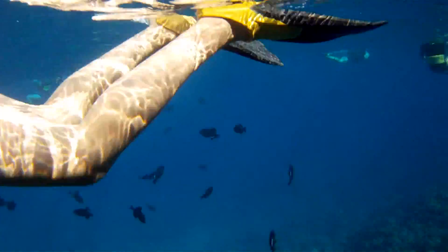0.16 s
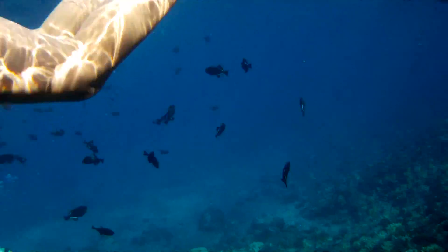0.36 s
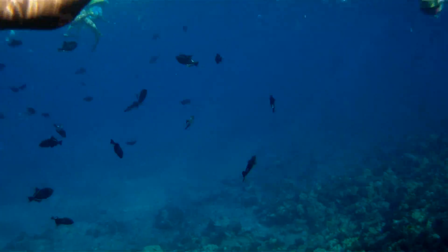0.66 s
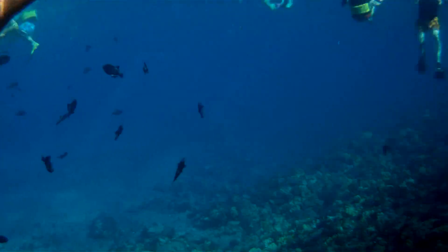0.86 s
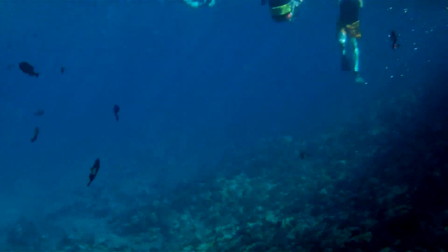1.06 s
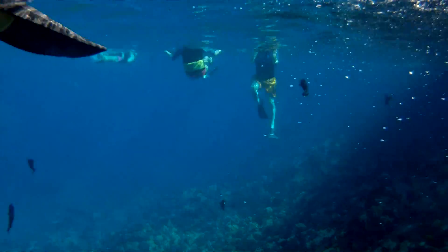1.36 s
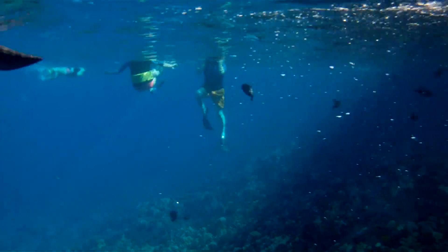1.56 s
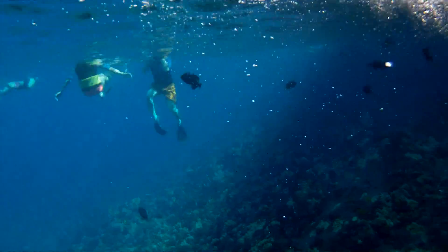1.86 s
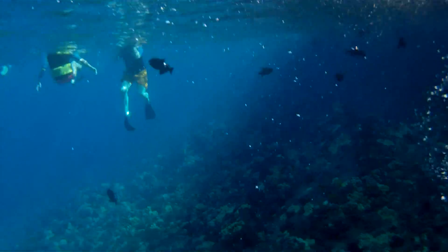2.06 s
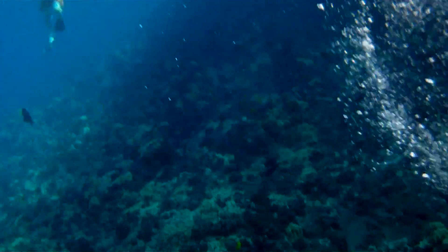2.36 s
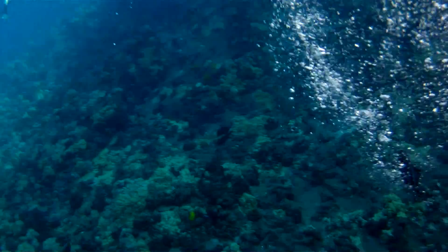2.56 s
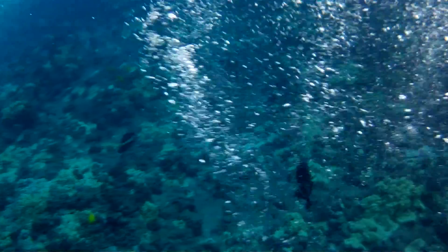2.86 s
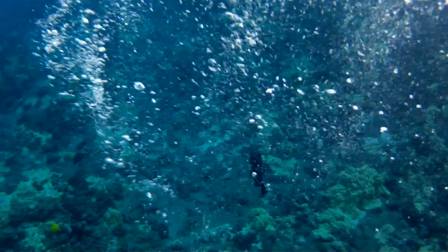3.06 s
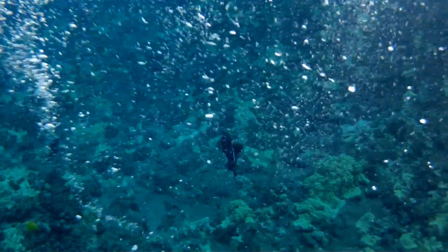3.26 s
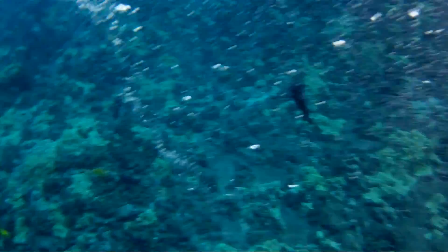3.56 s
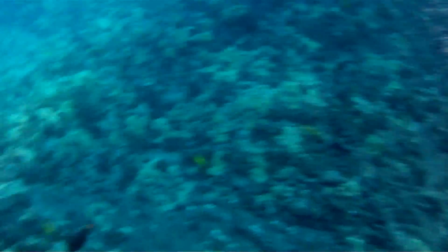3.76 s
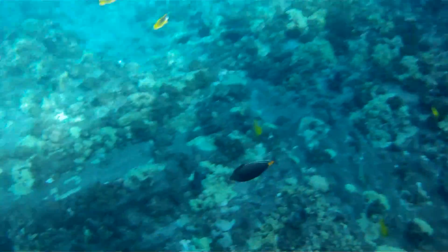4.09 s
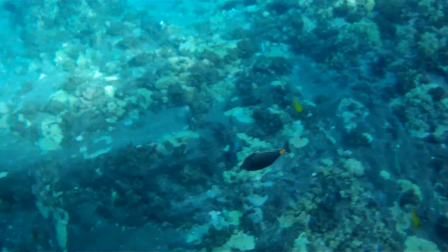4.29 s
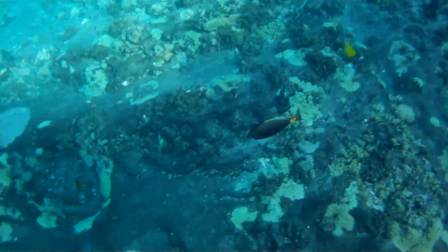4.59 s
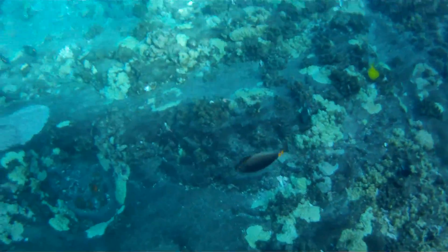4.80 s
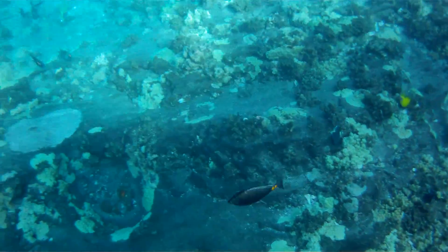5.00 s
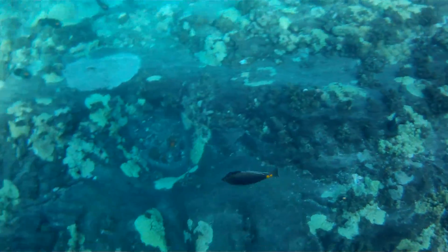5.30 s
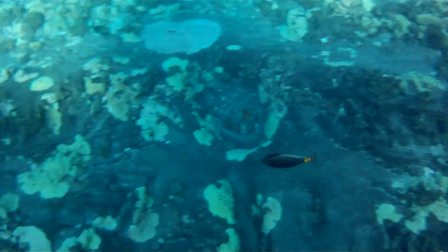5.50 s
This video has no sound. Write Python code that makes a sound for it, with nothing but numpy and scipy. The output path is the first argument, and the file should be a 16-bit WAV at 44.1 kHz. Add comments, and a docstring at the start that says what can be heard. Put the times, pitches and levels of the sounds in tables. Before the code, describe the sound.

Muffled underwater bubble fizz swells and thins over a coral reef, with a fin's churn, sharp bubble pops and constant shrimp crackle.

```python
"""Under water over a coral reef, heard from inside a camera's waterproof case.
Random clicks, shaped by the case, make bubbles that fizz and ring near 1.5 kHz and a fin that churns past.
Single bubbles, large and small, gulp or chirp as fading tones that rise in pitch; others pop as short knocks.
Snapping shrimp crackle all around, each snap a resonant click with scattered echoes.
A faint far tone, a gliding sine, rises and falls."""
import sys
import numpy as np
from scipy import signal
from scipy.fft import rfft, irfft
from scipy.io import wavfile

SR = 44100
rng = np.random.default_rng(int(sys.argv[2]) if len(sys.argv) > 2 else 0)


def persist_wave(psi):
    """Save psi, clipped to +-1, as 16-bit WAV."""
    counts = np.round(np.clip(psi, -1, 1) * 32767).astype(np.int16)
    wavfile.write(sys.argv[1], SR, np.atleast_2d(counts).T)


N = 248724
TIME = np.arange(N) / SR  # seconds

# How strong a shrimp's snap is at each pitch. Each row: frequency in Hz, relative level in dB.
SHRIMP_SPECTRUM = [(200, -41.5), (1200, -5.5), (2500, 6), (4000, 0), (6600, -4), (7300, -14), (8500, -14.5),
                   (9400, -29.5), (11000, -25.5), (12500, -49), (16000, -53.5)]

# Larger bubbles, relative to the fizz; they grow louder once, over a ramp centred on COARSE_AT_S.
BURBLE_DB, COARSE_DB, COARSE_AT_S, COARSE_OVER_S = -9.5, 6, 3.85, 0.52
# One fin stroke: its wake builds, peaks and dies away, driving churn, larger bubbles and spray.
FIN_AT_S, FIN_BUILD_S, FIN_FADE_S = 0.75, 0.22, 0.23
FIN_CHURN_DB, FIN_BURBLE_DB, FIN_SPRAY_DB = -53, -49.5, -53.5
SPRAY_LEAD_S, SPRAY_BUILD_S, SPRAY_FADE_S = 0.078, 0.54, 0.41
SEA_CHURN_DB = -65  # steady stirring of the open water
LUMP_PER_S, LUMP_DB = 11, 2  # eddies per second in the wake, and their typical scatter in level
STRAY_PER_S, STRAY_DB, STRAY_SCATTER_DB = 8, -42, 1.5  # shrimp at middle distance; peak level
SWING_AT_S, SWING_BUILD_S, SWING_FADE_S, SWING_DB = 3.65, 0.03, 0.11, -82
# Far tone: pitch and level at its top, and how far both have dropped TONE_HALF_S to either side.
TONE_AT_S, TONE_HALF_S = 4.45, 0.4
TONE_HZ, TONE_SAG_HZ, TONE_DB, TONE_FADE_DB = 385, 32.06, -75, 3
TOP_HZ = 15500  # nearly all sound above this is cut


def water():
    """Thousands of bubbles a second merge into a fizz; the fin's wake churns underneath in lumps."""
    # Spectra of small bubbles, larger bubbles and stirred water.
    # Each row: frequency in Hz, relative level in dB.
    fizz_spectrum = [(100, -53), (500, -42.5), (900, -21.5), (1150, -13), (1350, -2.5), (1480, 2.5),
                     (1680, -2), (1900, -13.5), (2300, -24), (3200, -28.5), (4000, -35.5), (7000, -42.5),
                     (12000, -91.5)]
    burble_spectrum = [(100, -54), (400, -23.5), (740, -16.5), (860, -5.5), (1170, 1), (1270, 9.5),
                       (1400, 4.5), (1650, -12.5), (2500, -37), (8000, -63)]
    churn_spectrum = [(25, -54), (60, -31), (100, -22), (150, -10), (340, 0.5), (600, 4), (900, 11.5),
                      (1500, -3), (3000, -19), (6000, -22), (12000, -46.5)]
    # Level of the fizz as bubble clouds drift by. Each row: time in seconds, level in dB.
    cloud = [(0, -50.5), (.3, -44), (.5, -40), (.78, -40.5), (1.4, -50), (1.88, -52.5), (2.12, -44.5),
             (2.6, -41), (2.87, -40.5), (3.35, -44), (3.85, -39.5), (4.4, -40.5), (4.85, -40.5),
             (5.4, -41.5), (5.63, -40.5)]

    cloud_db, = curves(cloud)
    wake = swell(FIN_AT_S, FIN_BUILD_S, FIN_FADE_S)
    coarse = np.clip(0.5 + (TIME - COARSE_AT_S) / COARSE_OVER_S, 0, 1)

    fizz = unit(through_case(clicks(per_s=3000, spread_db=2.5, ceiling_db=14), fizz_spectrum))
    burble = unit(through_case(clicks(per_s=2000, spread_db=4.5, ceiling_db=10), burble_spectrum))
    churn = unit(through_case(clicks(per_s=1400, spread_db=1.5, ceiling_db=7), churn_spectrum))

    # Independent causes of one sound add by power, hence hypot.
    cloud_burble = undb(cloud_db + BURBLE_DB + COARSE_DB * coarse)
    burble_gain = np.hypot(cloud_burble, wake * undb(FIN_BURBLE_DB))
    churn_gain = np.hypot(undb(SEA_CHURN_DB), wake * lumps() * undb(FIN_CHURN_DB))
    return fizz * undb(cloud_db) + burble * burble_gain + churn * churn_gain


def lumps():
    """The wake sheds eddies, so its churn has a gain that wanders from eddy to eddy."""
    steps = rng.standard_normal(400)
    return undb(LUMP_DB * np.interp(TIME * LUMP_PER_S, np.arange(len(steps)), steps))


def spray():
    """The passing fin whips up the finest bubbles, which sizzle and peak just ahead of its wake."""
    # Each row: frequency in Hz, relative level in dB.
    spectrum = [(1000, -17), (2300, 9.0), (3200, -1.5), (4200, -7.5),
                (6500, -10.0), (7300, -16.5), (8500, -25), (12000, -55.5)]
    gain = undb(FIN_SPRAY_DB) * swell(FIN_AT_S - SPRAY_LEAD_S, SPRAY_BUILD_S, SPRAY_FADE_S)
    sizzle = clicks(per_s=2300, spread_db=7, ceiling_db=18.5)
    return unit(through_case(sizzle, spectrum)) * gain


def gulps(cycles=9, rise=0.034, size=6000):
    """A single bubble, large or small, gulps or chirps for some cycles, rising in pitch as it goes up."""
    # Each row: start in seconds, level before fading in dB, starting pitch in Hz.
    bubbles = [(0.295, -45.5, 807), (0.3, -55, 518), (0.645, -40.5, 802), (0.65, -52, 478),
               (0.77, -38, 906), (0.779, -61, 304), (1.164, -45, 822), (1.17, -55.5, 560),
               (1.574, -39, 1450), (2.928, -27, 1744), (3.635, -52.5, 645), (3.66, -50.5, 587),
               (3.931, -22.5, 1420), (4.527, -37.5, 2870), (4.82, -32.5, 3100), (5.1, -42, 2320),
               (5.109, -41, 2800)]
    out = np.zeros(N)
    for s, db, hz in bubbles:
        turns = hz * np.arange(size) / SR
        age = turns / cycles
        envelope = (1 - np.exp(-turns)) * np.exp(-age)
        ring = np.sin(2 * np.pi * turns * (1 + rise * age / 2))
        add(out, s, undb(db) * envelope * ring)
    return out


def pops():
    """A bubble bursting on the case knocks its low resonances."""
    # Bursting bubbles. Each row: start in seconds, peak level in dB, centre frequency in Hz.
    bursts = [(0.860, -28.5, 2880), (0.917, -20, 2010), (1.903, -44, 2400), (2.0951, -27, 2360),
              (2.417, -35.5, 2700), (2.929, -23.5, 1840), (3.309, -33, 2840), (4.39, -35, 2700),
              (4.82, -25.5, 2110)]
    # Spectrum of a burst. Each row: frequency in Hz, relative level in dB.
    burst_spectrum = [(200, -7.5), (1000, -9.5), (1500, 13), (2200, -7.5), (6500, -3.5), (9000, -9.5),
                      (15000, -31.5)]
    out = np.zeros(N)
    for s, db, hz in bursts:
        knock = echoed(echo_db=-9, decay_s=0.004)
        for _ in range(2):
            knock = resonate(knock, hz, q=0.96)
        pop = through_case(knock, burst_spectrum)
        add(out, s, pop / np.abs(pop).max() * undb(db))
    return out


def near_shrimp():
    """The nearest shrimp snap one by one."""
    # Each row: start in seconds, peak level in dB, centre frequency in Hz.
    nearest = [(0.136, -37, 5100), (0.456, -37, 5500), (0.4904, -31, 4180), (0.7768, -31, 5200),
               (0.8587, -29, 5800), (0.9236, -25.5, 4800), (0.9698, -36.5, 4350), (0.9986, -37.5, 6540),
               (1.0875, -36.5, 4600), (1.207, -42, 6240), (1.347, -36.5, 6000), (1.551, -37, 4370),
               (1.903, -33.5, 5340), (2.0505, -34.5, 6040), (2.229, -36.5, 4730), (2.2827, -35.5, 4030),
               (2.568, -36.5, 6580), (2.6182, -33.5, 6260), (2.7044, -34, 4750), (3.3056, -35, 4900),
               (3.4422, -39.5, 5400), (3.5235, -37.5, 4300), (3.6623, -31.5, 5370), (3.714, -32.5, 5700),
               (3.7324, -33.5, 4410), (3.844, -34.5, 4960), (3.902, -38.5, 6350), (3.9477, -34, 6760),
               (4.109, -35.5, 4280), (4.559, -34, 4330), (4.7549, -32, 5130), (4.8915, -34, 4830),
               (5.585, -34.5, 5500)]
    out = np.zeros(N)
    for s, db, hz in nearest:
        add(out, s, snap(db, hz))
    return out


def snap(db, hz):
    """A claw collapses a cavity: one crack with a few milliseconds of echo."""
    crack = resonate(echoed(echo_db=-4, decay_s=0.0035), hz, q=2.8)
    crack = through_case(crack, SHRIMP_SPECTRUM)
    return crack / np.abs(crack).max() * undb(db)


def stray_shrimp(low_hz=4300, high_hz=7000):
    """Shrimp a little further off snap at random moments, each with its own colour."""
    out = np.zeros(N)
    for slot in range(int(STRAY_PER_S * N / SR)):  # one snap somewhere in each slot of time
        when, nearness, colour = rng.random(3)
        db = STRAY_DB + STRAY_SCATTER_DB * (2 * nearness - 1)
        hz = low_hz + colour * (high_hz - low_hz)
        add(out, (slot + when) / STRAY_PER_S, snap(db, hz))
    return out


def far_shrimp(count=24):
    """Colonies all over the reef crackle, each with its own path and colour."""
    # Level of the whole crackle. Each row: time in seconds, level in dB.
    crackle = [(0, -61), (1.35, -59.5), (1.75, -66.5), (2.3, -61.5), (3.2, -68.5), (3.9, -62), (4.5, -61.5),
               (4.9, -62), (5.6, -62.5)]
    level_db, = curves(crackle)
    reef = np.zeros(N)
    for hz in np.geomspace(2800, 8000, count):
        colony = clicks(per_s=40, spread_db=6, ceiling_db=24)
        path = echoed(echo_db=-6, decay_s=0.004)
        reef += signal.oaconvolve(resonate(colony, hz, q=3.2), path)[:N]
    return unit(through_case(reef, SHRIMP_SPECTRUM)) * undb(level_db)


def swing():
    """Water rumbles briefly over the case as it is swung round."""
    # Each row: frequency in Hz, relative level in dB.
    spectrum = [(25, -18.5), (70, -8), (150, -3.5), (400, -10.5), (1500, -54.0)]
    rumble = unit(through_case(rng.standard_normal(N), spectrum))
    return rumble * undb(SWING_DB) * swell(SWING_AT_S, SWING_BUILD_S, SWING_FADE_S)


def far_tone():
    """A faint, nearly pure tone arches slowly in pitch and level through the water."""
    arch = ((TIME - TONE_AT_S) / TONE_HALF_S) ** 2
    hz = TONE_HZ - TONE_SAG_HZ * np.minimum(arch, 2)
    gain = undb(TONE_DB - TONE_FADE_DB * arch ** 2)
    return gain * np.sqrt(2) * np.sin(2 * np.pi * np.cumsum(hz) / SR)  # sqrt(2): a sine of rms 1


def clicks(per_s, spread_db, ceiling_db):
    """Random impulses: most are far and small, a few near and large."""
    chance = rng.random(N)
    size = rng.exponential(size=N)
    sign = rng.choice([-1, 1], N)
    return (chance < per_s / SR) * sign * undb(np.minimum(spread_db * size, ceiling_db))


def echoed(echo_db, decay_s, size=2048):
    """A sharp impulse, a near reflection that colours it, then scattered returns from surface and coral."""
    t = np.arange(size) / SR
    returns = rng.standard_normal(size) ** 3 * np.exp(-t / decay_s)  # cubing makes a few stand out
    path = (t == 0) + undb(echo_db) * returns / np.linalg.norm(returns)
    path[rng.integers(4, 30)] += rng.uniform(-0.6, 0.6)  # the near reflection
    return path


def through_case(x, spectrum, size=4096):
    """Give x a source's spectrum and the ringing of the case, which only ever follows the sound."""
    # Resonances and dead spots of the case. Each row: centre in Hz, width in Hz, boost or cut in dB.
    case = [(1450, 163, 4.5), (1552, 110, -5.5), (1634, 54, 3.5), (2047, 58, -12), (2254, 296, 6.5),
            (2610, 91, -9), (2857, 182, 7), (3240, 220, 4), (3790, 140, -5), (4370, 110, 5.5),
            (4770, 190, -4), (5325, 500, 5.5), (5790, 300, -6), (6330, 860, 5), (9800, 250, -4)]
    f = np.linspace(0, SR / 2, size // 2 + 1)
    hz, db = np.transpose(spectrum)
    db = np.interp(np.log(f + 1), np.log(hz), db)
    for centre, width, gain in case:
        db = db + gain * np.exp(-2 * ((f - centre) / width) ** 2)
    # Folding the cepstrum (the spectrum of the log spectrum) forward leaves no ringing before the sound.
    cepstrum = irfft(np.log(undb(db)))
    cepstrum[1:size // 2] *= 2
    cepstrum[size // 2 + 1:] = 0
    ringing = irfft(np.exp(rfft(cepstrum)))
    return signal.fftconvolve(x, ringing)[:len(x)]


def resonate(x, hz, q):
    """One broad resonance, which favours the pitches around hz."""
    b, a = signal.iirpeak(min(hz, SR / 4), max(q, 0.5), fs=SR)
    return signal.lfilter(b, a, x)


def swell(at_s, build_s, fade_s):
    """A gain that grows exponentially to 1 and dies away again."""
    return np.exp(-np.maximum((at_s - TIME) / build_s, (TIME - at_s) / fade_s))


def undb(db):
    """Decibels to gain."""
    return 10 ** (np.asarray(db) / 20)


def unit(x):
    """Scale to rms 1."""
    return x / np.sqrt(np.mean(x ** 2))


def curves(table):
    """Each column of a table of timed rows, sample by sample."""
    s, *columns = np.transpose(table)
    return [np.interp(TIME, s, c) for c in columns]


def add(out, s, x):
    """Mix x into out from time s on."""
    i = max(int(s * SR), 0)
    out[i:i + len(x)] += x[:N - i]


def scene():
    """All sources meet at the one microphone in the case."""
    bubbles = water() + spray() + gulps() + pops()
    shrimp = near_shrimp() + stray_shrimp() + far_shrimp()
    return (bubbles + shrimp + swing() + far_tone())[None]


def record(dry):
    """The camera thins the deep bass and cuts the top."""
    bass_cut = signal.butter(1, 90, "high", fs=SR, output="sos")
    top_cut = signal.ellip(8, 0.2, 70, TOP_HZ, fs=SR, output="sos")  # ripple 0.2 dB, cut 70 dB
    thinned = signal.sosfilt(bass_cut, dry)
    return signal.sosfilt(top_cut, thinned)


dry = scene()
out = record(dry)
persist_wave(out)
```